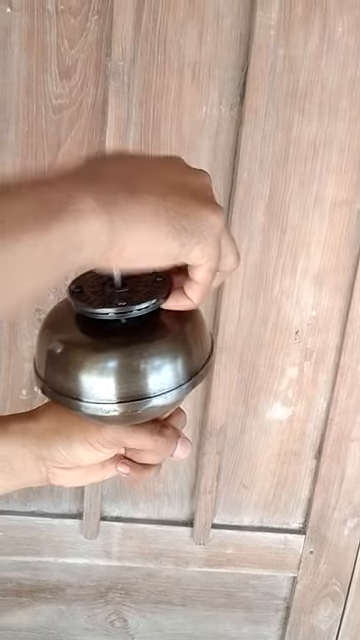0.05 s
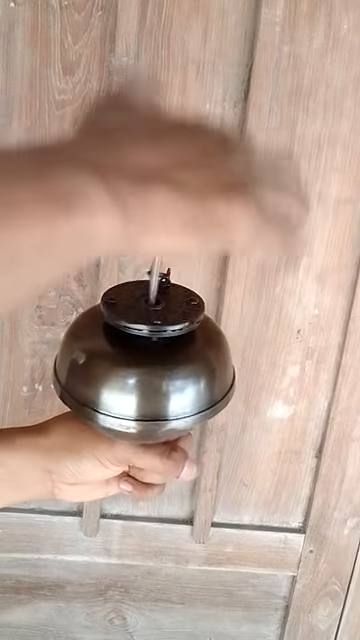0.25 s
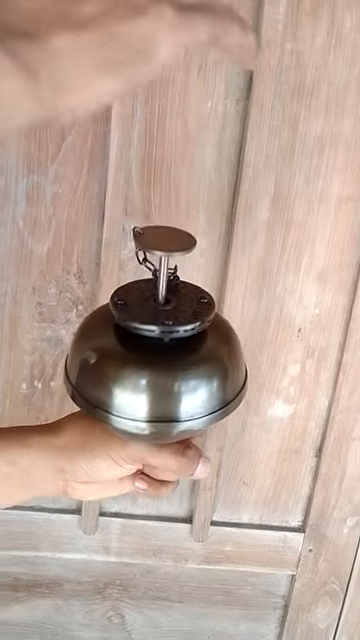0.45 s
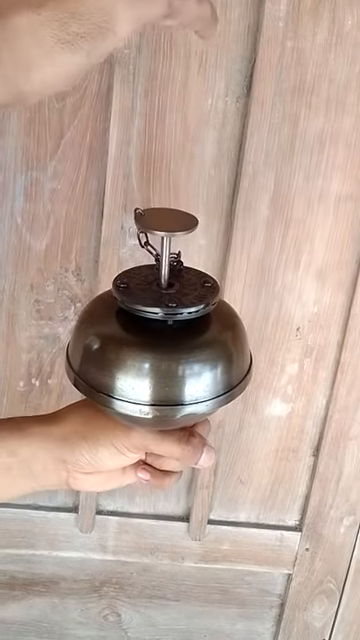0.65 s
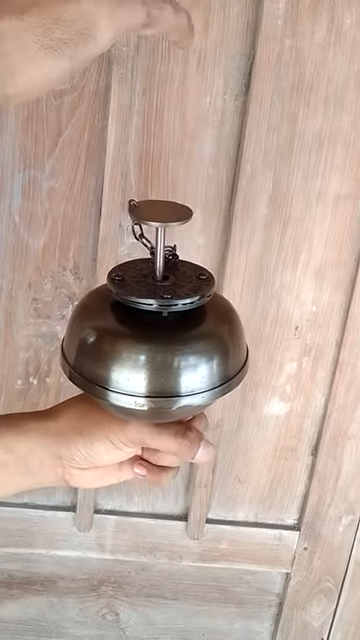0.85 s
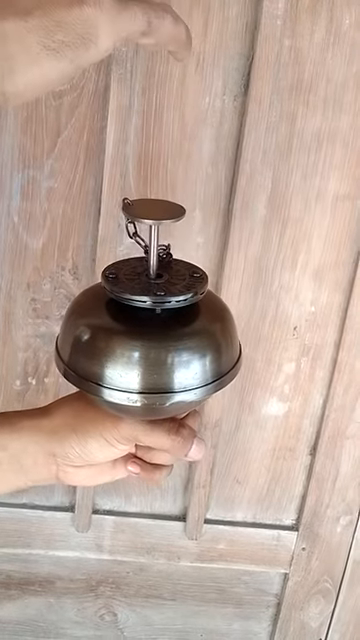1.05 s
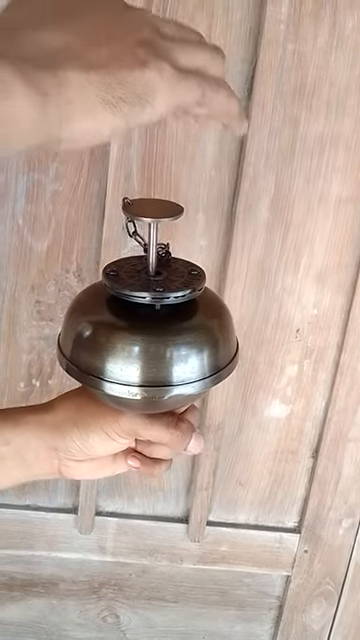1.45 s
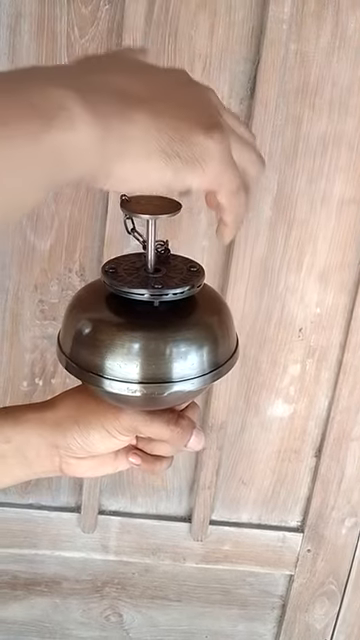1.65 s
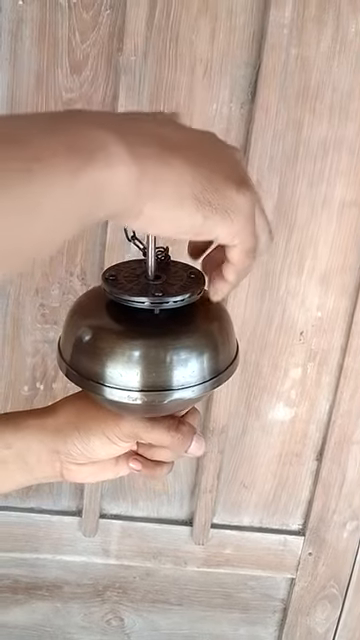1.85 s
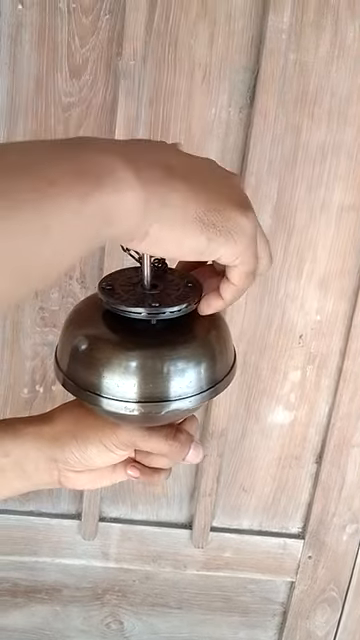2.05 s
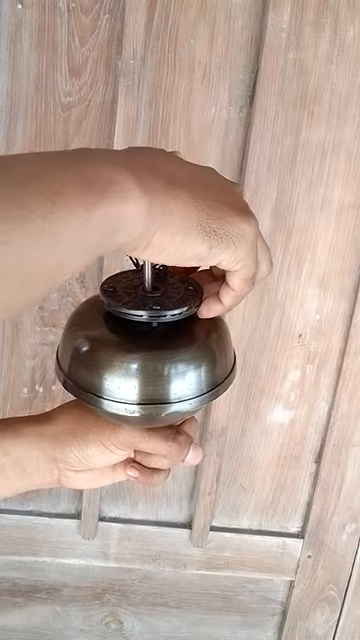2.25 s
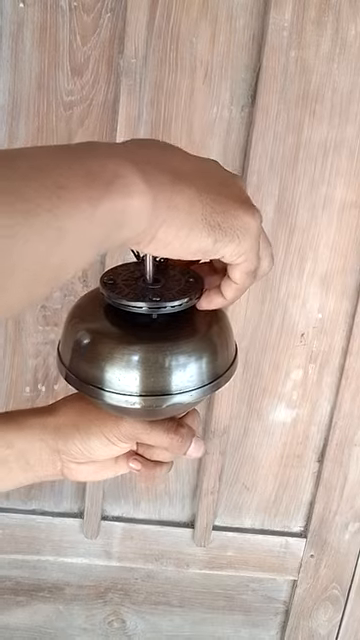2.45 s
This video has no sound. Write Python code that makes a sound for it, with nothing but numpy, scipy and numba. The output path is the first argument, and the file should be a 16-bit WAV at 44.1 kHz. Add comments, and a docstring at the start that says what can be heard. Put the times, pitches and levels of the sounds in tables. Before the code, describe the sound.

A desk bell is slapped close to the microphone, clanging at about 0.2 seconds and again just before 0.4 as the plunger springs back. Both strikes are bright, rattly and slightly distorted. The highest overtones vanish quickly, leaving two clear tones with a fast waver. The ring dips, swells again around 1 second, then fades gradually in the quiet room, faint by about 2.5 seconds.

```python
"""Two harsh clangs of a desk bell, then a ring that dips and swells again in a quiet room.
A palm slaps the plunger; the clapper strikes the steel dome going down and again springing back.
The dome's modes come in close pairs that beat. So near the microphone they overload the input,
which adds harshness and difference tones. The gain control ducks, holds, then recovers,
lifting the two lowest tones, which decay most slowly."""
import sys
import numpy as np
from scipy import signal
from scipy.fft import rfft, irfft, next_fast_len
from scipy.io import wavfile
from scipy.ndimage import uniform_filter1d, minimum_filter1d
from numba import njit

SR = 44100
rng = np.random.default_rng(int(sys.argv[2]) if len(sys.argv) > 2 else 0)


def bounce(signal):
    """Save signal as a 16-bit WAV file at the path given by the first command-line argument."""
    frames = np.transpose(np.atleast_2d(signal))
    limited = np.clip(frames, -1, 1)
    pcm = np.round(limited * 32767).astype(np.int16)
    wavfile.write(sys.argv[1], SR, pcm)


N = 114660

# downstroke and rebound of the clapper: start_s, clatter_db, clatter_t60_s, thump_db, contact_s
CLAPPER_BLOWS = [(0.2304, -3.5, 0.19, -10, 0.027), (0.3628, -5, 0.22, -17.5, 0.016)]


def dome(t):
    """Modal vibration: each close pair of modes builds up, beats at its frequency split and decays."""
    # mode pairs: lower_hz, t60_s, split_hz, build_s,
    # downstroke_lower_db, downstroke_upper_db, rebound_lower_db, rebound_upper_db
    mode_pairs = [ (1089.5, 6.18, 0.9, 0.002, -28, -49, -24.5, -44.5),
                  (2631, 2.36, 5.9, 0.0051, -5, -12.5, -2.97, -10),
                  (4547.4, 0.72, 6, 0.017, 5.5, -20.5, 9.5, -24),
                  (6853, 0.2, 7.4, 0.003, 8, -4.5, -1.5, 4.5), (9573, 0.22, 9, 0.012, -3.5, 10, 10.5, -6.5),
                  (12692, 0.1768, 17, 0.01, 5, -10.5, -7.5, 1.5)]
    # modes still sounding from an earlier blow: pitch_hz, t60_s, level_db
    earlier_ring = [(1095, 5, -42), (2630, 1.2, -72)]
    # slow waver of the lowest tone: time_s, gain_db
    waver_curve = [(0.55, -0.5), (0.85, -2), (1.05, -0.5), (1.3, -1.5), (1.75, 1.1), (2.1, 3.05),
                   (2.4, 3.9), (2.6, 3.5)]
    # when the pairs are in phase, for each blow: time_s
    in_phase_s = [0.22, 0.331]
    choke_s, bloom_share = 0.003, 0.7
    hand_s, hand_db_per_s = 2.07, 11  # the returning hand damps the dome
    ring = sum(undb(db) * fade(t, t60) * np.sin(2 * np.pi * hz * t) for hz, t60, db in earlier_ring)
    waver = envelope(t, waver_curve)
    for blow, (start, *_) in enumerate(CLAPPER_BLOWS):
        age = t - start
        ring = ring * np.exp(-np.maximum(age, 0) / choke_s)  # a new blow stops the ring before it
        for mode, (hz, t60, split_hz, build_s, *levels_db) in enumerate(mode_pairs):
            lower, upper = undb(levels_db[2 * blow:2 * blow + 2])
            phase = 2 * np.pi * hz * age
            beat_phase = 2 * np.pi * split_hz * (t - in_phase_s[blow])
            pair = lower * np.sin(phase) + upper * np.sin(phase + beat_phase)
            bloom = 1 - bloom_share * np.exp(-np.maximum(age, 0) / build_s)
            ring = ring + pair * bloom * fade(age, t60) * (waver if mode == 0 else 1)
    return ring * undb(-hand_db_per_s * np.maximum(t - hand_s, 0))


def clapper(t):
    """Impact excitation: each blow rattles the mechanism; the base thumps while the plunger bears on it."""
    spurts_per_s, spurt_depth_db, thump_fall_s = 590, 5.5, 0.006
    spurts = undb(spurt_depth_db * np.interp(t * spurts_per_s, np.arange(N), rng.standard_normal(N)))
    impacts = 0
    for start, clatter_db, t60, thump_db, contact_s in CLAPPER_BLOWS:
        age = t - start
        clatter = undb(clatter_db) * fade(age, t60) * spurts * mechanism_noise()
        push = (age >= 0) * np.exp(-np.maximum(age - contact_s, 0) / thump_fall_s)
        thump = undb(thump_db) * push * resonance(hz=110, width_hz=37)
        impacts = impacts + clatter + thump
    return impacts


def mechanism_noise():
    """Brief metal contacts spread their energy over a broad band; rms 1."""
    # spectrum of the clapper and its spring: frequency_hz, relative_db
    spectrum = [(60, -4.5), (300, -0.5), (900, 0), (2000, -1), (4000, -5), (8000, 1.5), (14000, -2.5),
                (20000, -8.5)]
    return noise(spectrum)


def plunger(t):
    """Sliding friction: the stem rubs and rings in its guide, scraping harder up to the first blow."""
    # rubbing of the stem: time_s, level_db
    slide = [(0.135, -92), (0.16, -63), (0.182, -66), (0.199, -59), (0.216, -29.5), (0.23, -20.5),
             (0.3, -43), (0.55, -60.5), (0.8, -84)]
    scrape_db, rise_db_per_s = -25.5, 821
    rub = envelope(t, slide) * (t < slide[-1][0]) * resonance(hz=780, width_hz=110)
    lead_s = CLAPPER_BLOWS[0][0] - t
    scrape = (lead_s > 0) * undb(scrape_db - rise_db_per_s * np.abs(lead_s)) * mechanism_noise()
    return rub + scrape


def faint_tones(t):
    """Exponential fade: faint high tones and one soft low tone die away after the second clang."""
    # fading tones: pitch_hz, t60_s, level_db
    tones = [(870, 0.82, -46.5), (6300, 1.5, -53), (7181, 0.9, -44.5), (8100, 0.9, -46),
             (9092, 0.55, -23.5)]
    age = t - CLAPPER_BLOWS[-1][0]
    return sum(undb(db) * fade(age, t60) * np.sin(2 * np.pi * hz * age) for hz, t60, db in tones)


def chain(t):
    """Decaying band noise: the chain shivers after the rebound."""
    age = t - CLAPPER_BLOWS[-1][0]
    return undb(-26.5) * fade(age, t60=0.71) * resonance(hz=8700, width_hz=2700)


def base_knocks(t):
    """Heavily damped resonance: the base knocks softly in the hand."""
    # contacts with the hand: start_s, pitch_hz, level_db
    knocks = [(0.464, 110, -33.5), (0.798, 454, -64), (1.095, 400, -56), (2.014, 816, -65)]
    return sum(undb(db) * fade(t - start, t60=0.065) * resonance(hz, width_hz=84)
               for start, hz, db in knocks)


def room(t):
    """Stationary noise: a steady low rumble fills the room."""
    # room spectrum: frequency_hz, relative_db
    spectrum = [(20, 6), (60, -0.5), (150, -10), (300, -27.5), (1000, -32), (2500, -36.5), (5000, -38),
                (16000, -37.5)]
    return undb(-69.5) * noise(spectrum)


def hiss(t):
    """Amplitude-modulated noise: a faint hiss swells under the ring and falls away."""
    # hiss spectrum: frequency_hz, relative_db
    spectrum = [(50, 1), (250, -1), (700, -8), (1500, -9.5), (2600, -11), (4000, -25), (16000, -30.5)]
    # rise and fall of the hiss: time_s, level_db
    levels = [(0.1, -89), (0.55, -69), (1.1, -69.5), (1.4, -72.5), (1.95, -71.5), (2.25, -84), (2.6, -88)]
    return envelope(t, levels) * noise(spectrum)


def undb(db):
    """Decibels to amplitude ratio."""
    return 10 ** (np.asarray(db) / 20)


def envelope(t, points):
    """Amplitude along straight lines in decibels through (time_s, level_db) points."""
    return undb(np.interp(t, *np.array(points).T))


def fade(age, t60):
    """Exponential decay from age 0, falling 60 dB in t60 seconds."""
    return (age >= 0) * np.exp(-np.log(1000) * np.maximum(age, 0) / t60)


def colour(x, points):
    """Minimum-phase filter through (frequency_hz, gain_db) points."""
    size = next_fast_len(len(x) + 8192) // 2 * 2
    hz, db = np.array(points, float).T
    bin_hz = np.maximum(np.arange(size // 2 + 1) * SR / size, 1)
    gain = undb(np.interp(np.log(bin_hz), np.log(hz), db))
    cepstrum = irfft(np.log(gain))
    cepstrum[1:size // 2] *= 2  # folding onto positive time makes the filter causal
    cepstrum[size // 2 + 1:] = 0
    return irfft(rfft(x, size) * np.exp(rfft(cepstrum)))[:len(x)]


def noise(points):
    """White noise filtered to a given spectrum; rms 1."""
    x = colour(rng.standard_normal(N), points)
    return x / x.std()


def resonance(hz, width_hz):
    """Random excitation of two like resonators in series; rms 1."""
    b, a = signal.iirpeak(hz, hz / width_hz, fs=SR)
    x = signal.lfilter(b, a, signal.lfilter(b, a, rng.standard_normal(N)))
    return x / x.std()


def overload(x):
    """Nonlinear distortion: off-centre clipping and a square law add harmonics and difference tones."""
    oversample, offset, square_share = 4, 0.0075, 0.0057
    clipped = np.clip(signal.resample_poly(x + offset, oversample, 1), -1, 1)
    return signal.resample_poly(clipped + square_share * clipped ** 2, 1, oversample)


@njit
def duck(over_db, hold_samples, recover_db_per_sample):
    """Peak hold: the cut in decibels jumps to each overshoot, holds, then recovers at a steady rate."""
    cut_db, cut, wait = np.zeros(len(over_db)), 0., 0.
    for i in range(len(over_db)):
        wait -= 1
        if over_db[i] > 0 and over_db[i] >= cut - .1:
            cut, wait = max(cut, over_db[i]), hold_samples
        elif wait < 0:
            cut = max(cut - recover_db_per_sample, 0.)
        cut_db[i] = cut
    return cut_db


def gain_control(x):
    """Look-ahead limiting: the gain falls smoothly just before each loud peak."""
    ceiling_db, makeup_db = -7.5, 1.22
    hold_s, recover_db_per_s, window_s = 0.52, 57.5, 0.036
    peak_db = 20 * np.log10(np.clip(np.abs(x), 1e-6, 1))
    cut_db = duck(peak_db + makeup_db - ceiling_db, hold_s * SR, recover_db_per_s / SR)
    window = int(window_s * SR)
    lowest_db = minimum_filter1d(makeup_db - cut_db, window)
    return undb(uniform_filter1d(lowest_db, window))


def scene():
    """Superposition of bell, mechanism, faint tones, room and hiss; 1 is the overload point."""
    t = np.arange(N) / SR
    foreground = dome(t) + clapper(t) + plunger(t) + faint_tones(t) + chain(t) + base_knocks(t)
    return (foreground + room(t) + hiss(t))[None]


def record(dry):
    """Stages in cascade: the input clips, the treble is softened, the gain ducks and the top is cut."""
    # frequency response after the overload: frequency_hz, gain_db
    response = [(30, 2.5), (300, 3), (1000, 4.5), (2600, 1), (4500, -6.5), (6500, -12.5), (9000, -21),
                (10700, -29), (12000, -22), (15500, -18.5)]
    top_hz = 15650
    ducked = colour(overload(dry[0]), response) * gain_control(dry[0])
    lowpass = signal.ellip(10, .2, 80, top_hz, fs=SR, output="sos")
    return signal.sosfilt(lowpass, ducked)[None]


dry = scene()
out = record(dry)
bounce(out)
```